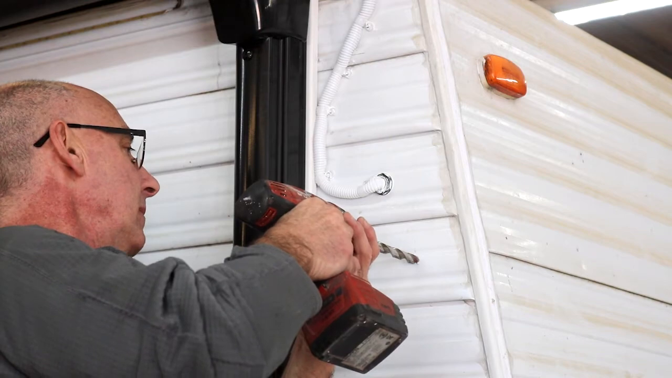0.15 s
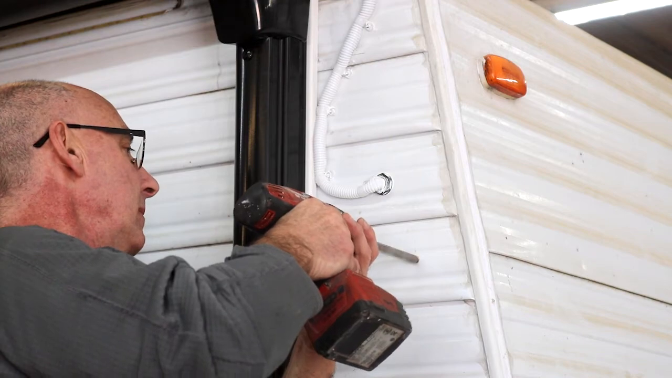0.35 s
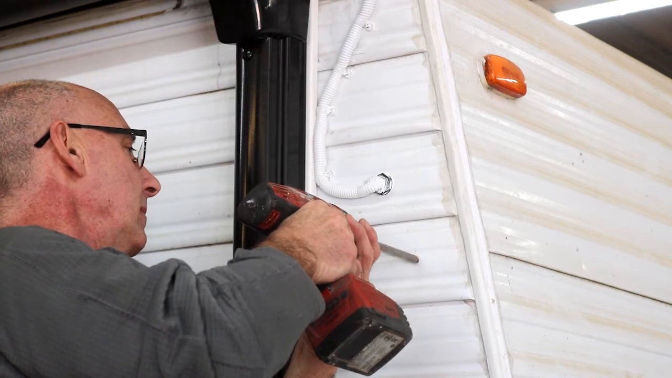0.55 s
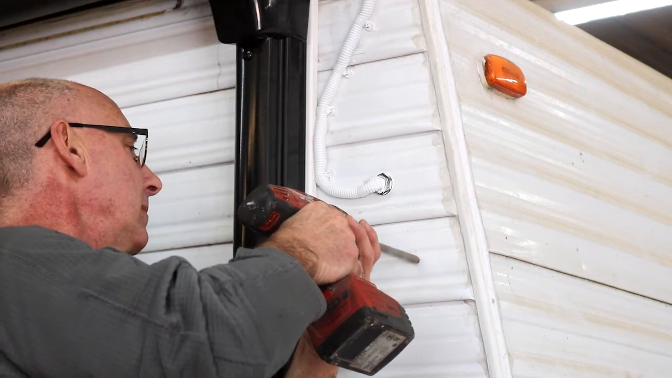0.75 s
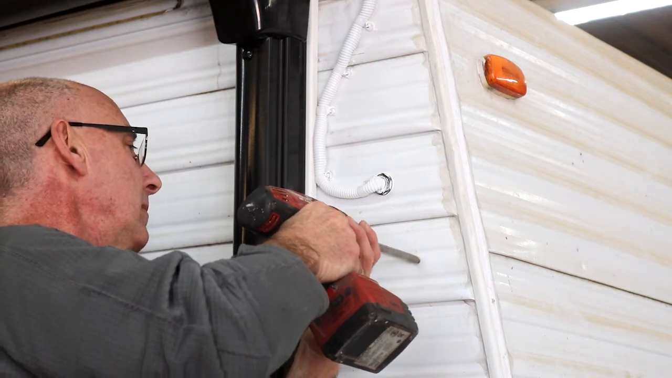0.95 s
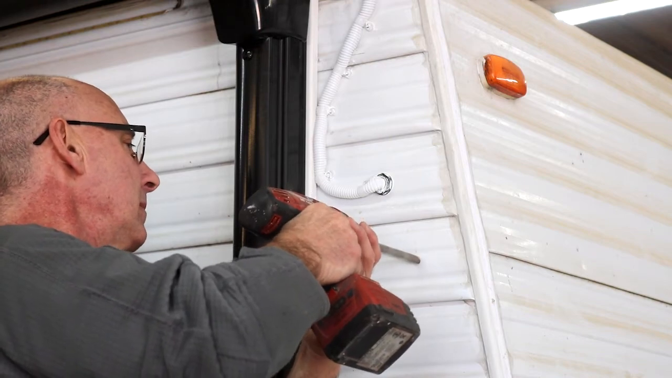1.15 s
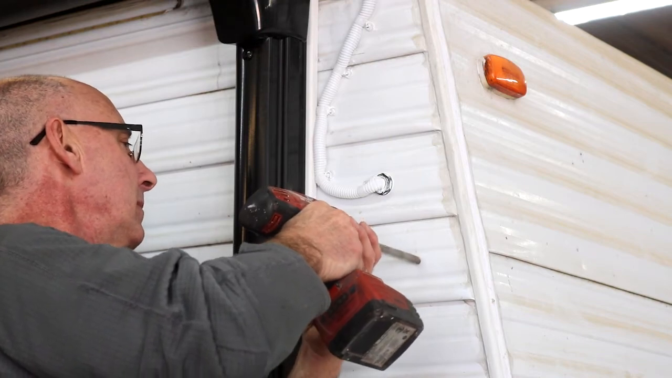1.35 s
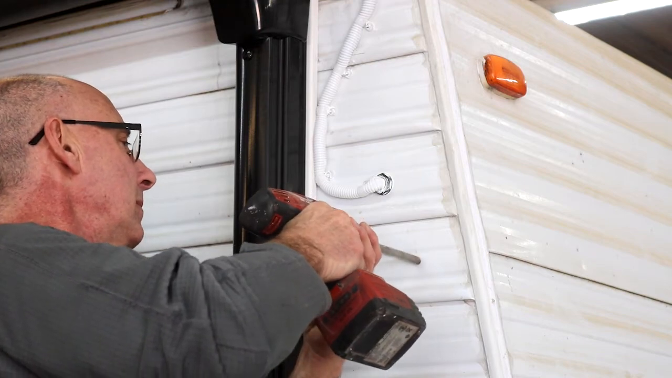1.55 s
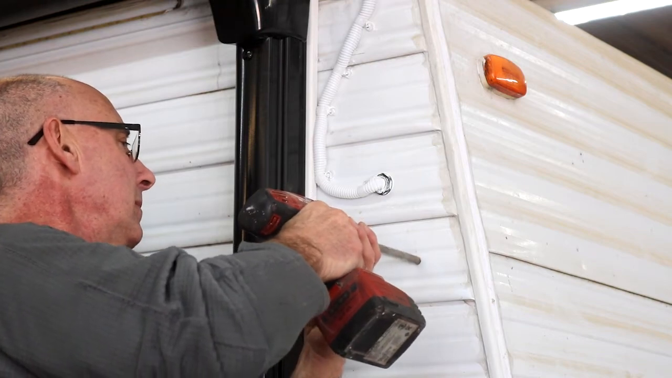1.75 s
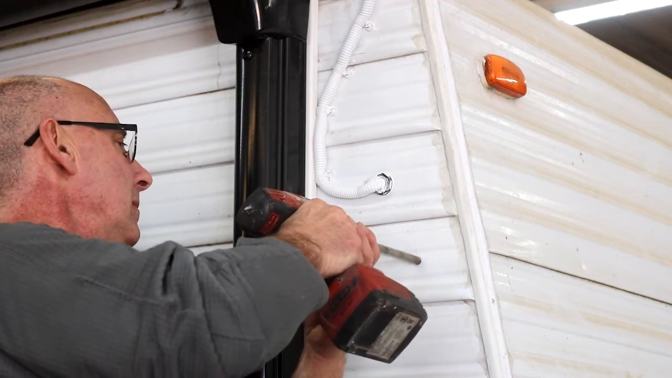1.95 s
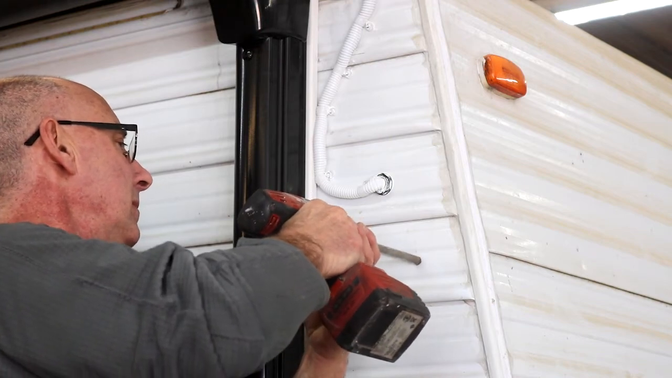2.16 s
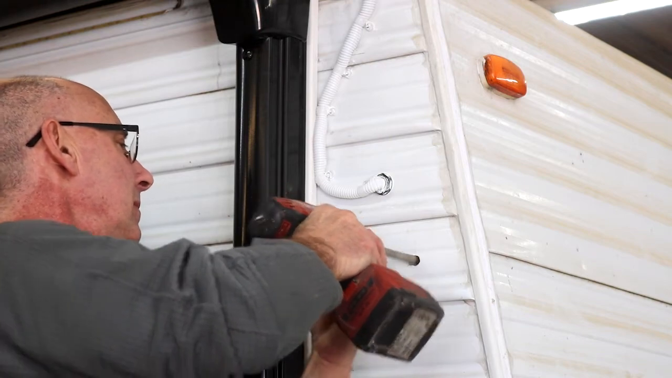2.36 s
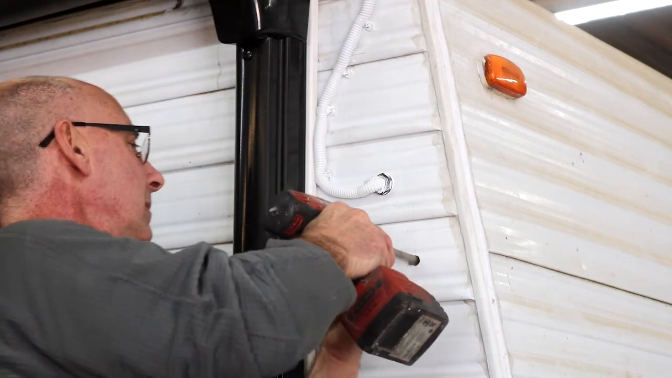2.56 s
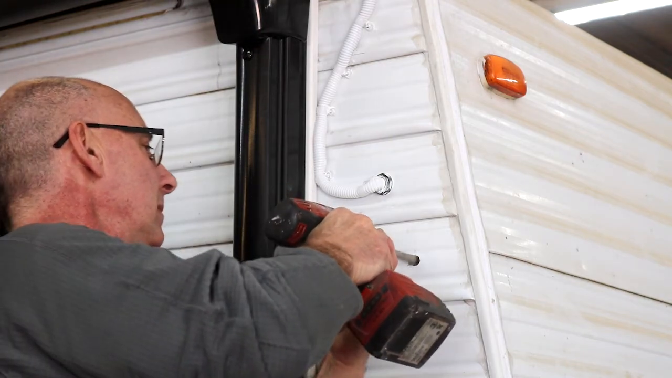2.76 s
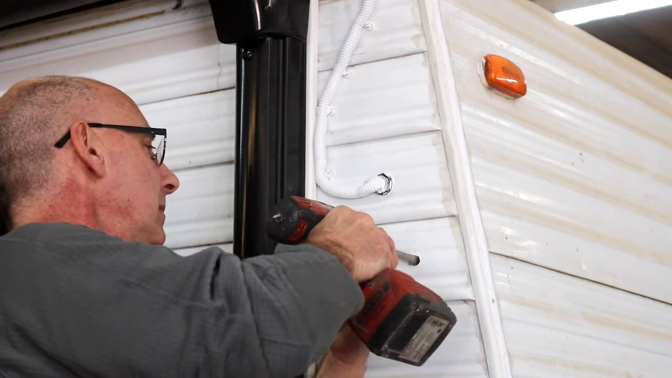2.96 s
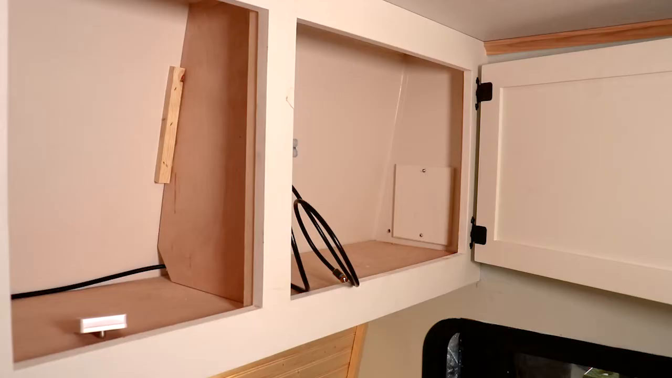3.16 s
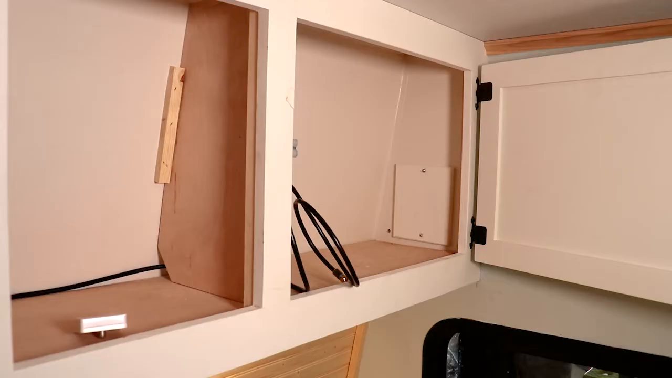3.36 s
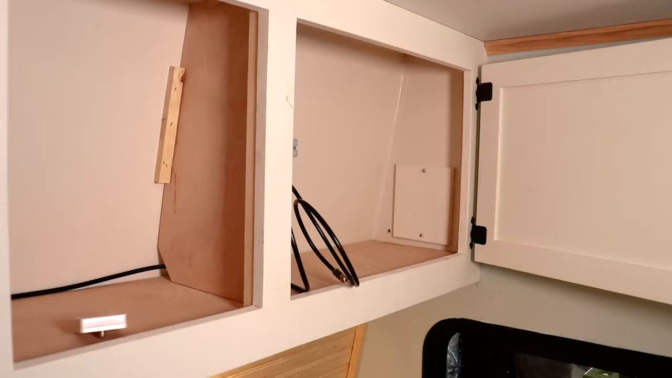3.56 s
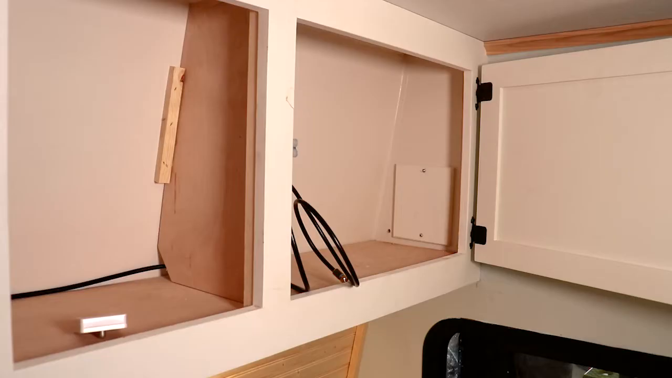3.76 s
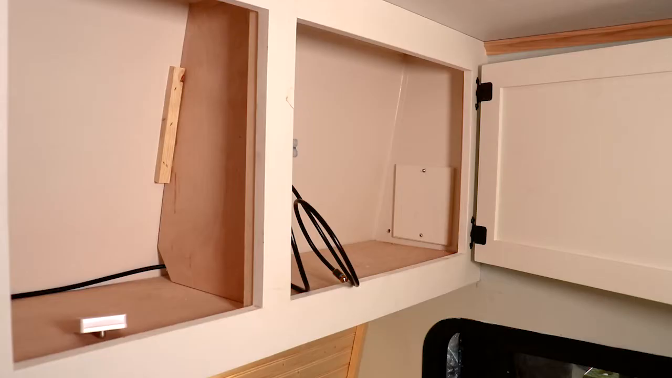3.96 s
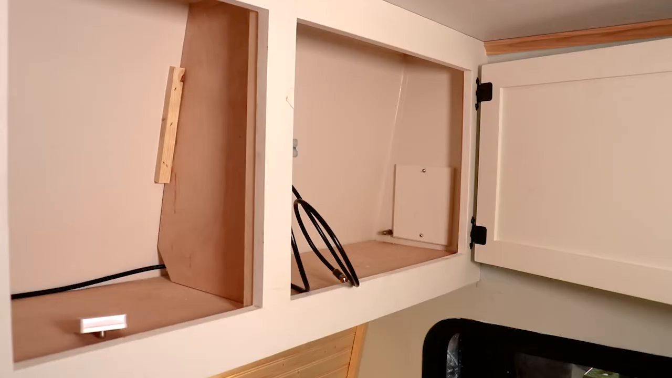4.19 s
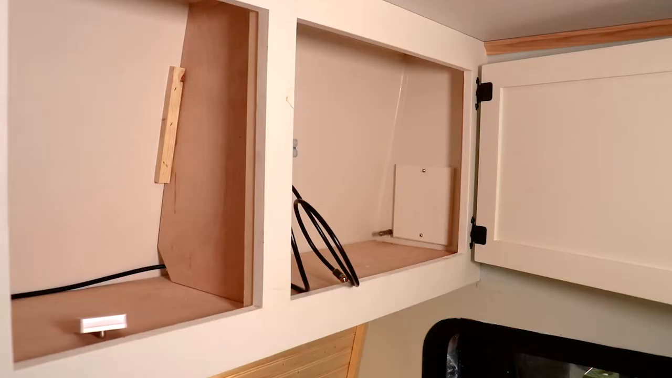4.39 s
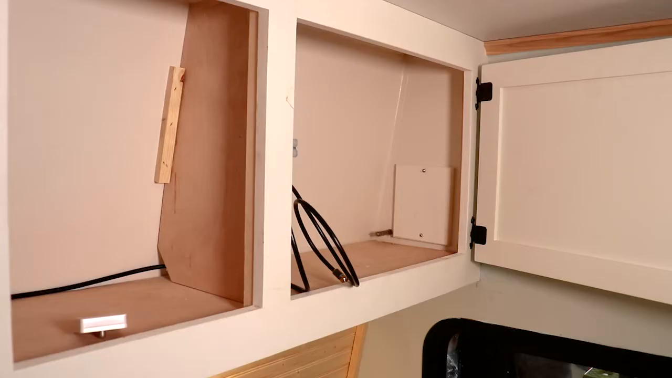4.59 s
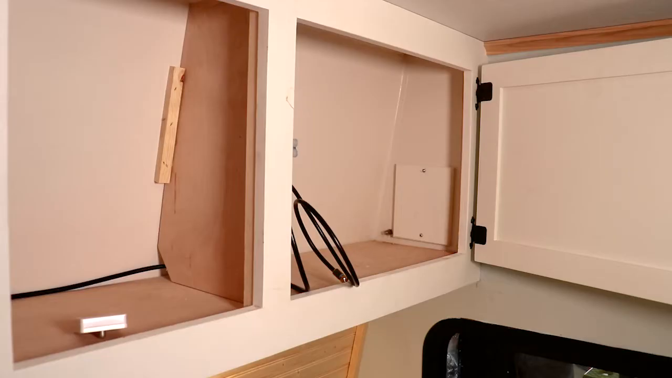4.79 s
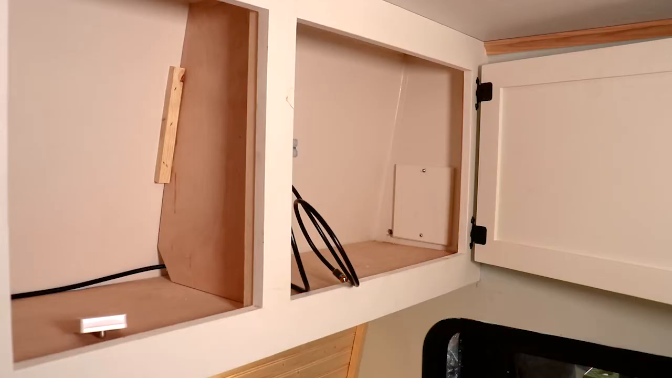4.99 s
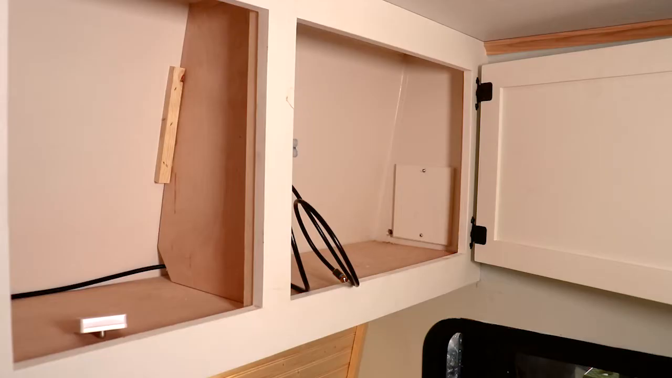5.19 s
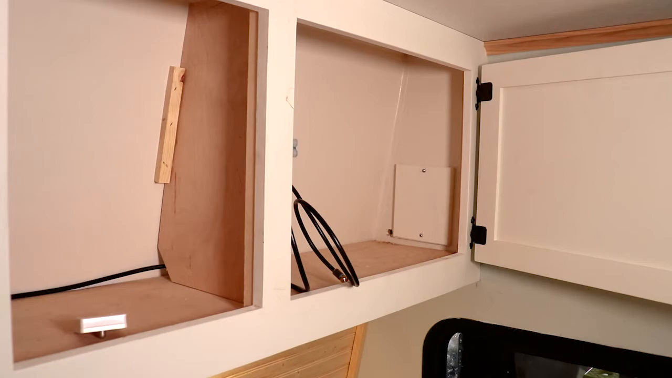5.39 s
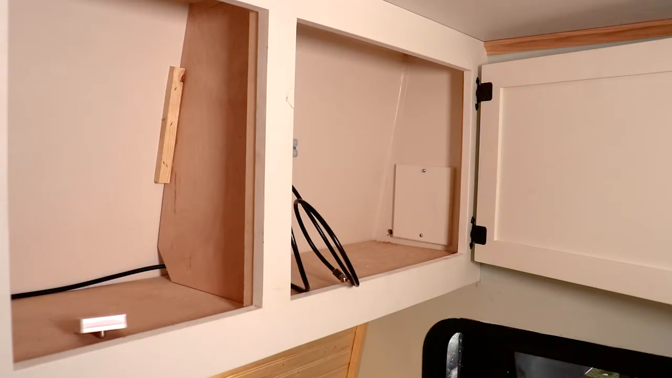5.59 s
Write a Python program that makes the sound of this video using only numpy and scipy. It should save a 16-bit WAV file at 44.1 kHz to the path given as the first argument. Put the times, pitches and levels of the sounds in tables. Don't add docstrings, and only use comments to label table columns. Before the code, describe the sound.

Trigger click, loud drill whine and rattling metal bites, cracking breakthrough, then quieter muffled drilling heard from the cabinet, ending in an abrupt stop.

```python
import sys
import numpy as np
from scipy import signal
from scipy.fft import rfft, irfft
from scipy.io import wavfile
from scipy.ndimage import uniform_filter1d

SR = 44100
rng = np.random.default_rng(int(sys.argv[2]) if len(sys.argv) > 2 else 0)


def to_wav(s):
    ch = np.atleast_2d(s).T
    pcm = np.round(np.clip(ch, -1, 1) * 32767)
    wavfile.write(sys.argv[1], SR, pcm.astype(np.int16))


def field_ratio(decibels):
    return 10 ** (np.asarray(decibels, dtype=float) / 20)


N = 248415
T = np.arange(N) / SR

SCENE_CHANGES_S = 3.195
OUTSIDE_NOW = T < SCENE_CHANGES_S
START_S, SPIN_UP_S, BRAKE_S = 0.32, 0.087, 5.238
DIGS_IN_S = 0.91

# time in seconds, effort in dB, cut in dB (how hard the edges scrape),
# depth in dB (how much wall the bit shakes).
WORK = [(.4, 2.5, -6.5, -2.5), (.5, 4, -2, 0), (.58, 2.5, -5, 2.5), (.92, 2.5, -3, 1),
        (1.16, 1.5, -1, -1.5), (1.82, -1, 2, -1), (2.3, -0.5, 1.5, 4), (2.84, -5, -4, 4),
        (3.04, -1.5, 0.5, 3.5), (3.19, 0, -4, 7), (3.2, -3, 1, 3), (3.42, -2, -0.5, -1),
        (3.96, 0.5, 3.5, 0.5), (4.19, -1, 0, -0.5), (4.45, -0.5, -5, -1), (4.8, 3, -6, 4), (5.15, .5, 0, 4),
        (5.28, 1, 5, 0)]
# start in seconds, peak in dB, ring in Hz.
CRACKS = [(2.301, -6.5, 1380), (2.314, -2, 2640), (2.32, -11.5, 690), (2.366, -19, 1410), (2.403, -8, 1420),
          (2.433, -8, 1180), (2.473, -10.5, 660), (2.607, -6, 1430), (2.65, -7.5, 1070), (2.661, -4, 704),
          (2.667, -9, 676), (2.689, -7.5, 1140), (2.728, -13, 660), (2.82, -16, 680), (2.913, -7.5, 720),
          (2.972, -17, 1200), (3.041, -7, 1210), (3.066, -5, 1380), (3.118, -7.5, 734)]


def evened(x):
    return x / np.sqrt(np.mean(x ** 2) + 1e-20)


def read(points, hz):
    f, value = np.transpose(points)
    return np.interp(np.log(hz + 1), np.log(f + 1), value)


def columns(rows):
    s, *rest = np.transpose(rows)
    return [np.interp(T, s, c) for c in rest]


def wander(hz):
    z = rfft(rng.standard_normal(N))
    return evened(irfft(z / (1 + (np.fft.rfftfreq(N, 1 / SR) / hz) ** 2), N))


def band_passed(x, low_hz, high_hz):
    sos = signal.butter(2, [low_hz / SR * 2, high_hz / SR * 2], "band", output="sos")
    return signal.sosfilt(sos, x)


def rumble():
    low = band_passed(rng.standard_normal(N), 22, 200)
    return field_ratio(np.where(OUTSIDE_NOW, -62., -72.)) * evened(low)


def lamp_hum():
    # frequency in Hz, level in dB.
    lamps = [(120, -57), (240, -74), (360, -60), (600, -61)]
    hum = sum(field_ratio(db) * np.sin(2 * np.pi * hz * T) for hz, db in lamps)
    return hum * np.where(OUTSIDE_NOW, 1, field_ratio(-12.0))


def hall(x):
    # frequency in Hz, time to fall 60 dB in seconds.
    decay = [(100, 0.62), (500, 0.41), (2000, 0.21), (6000, 0.076), (15000, 0.047)]
    taps = np.zeros(SR)
    at = np.arange(200, SR - 20, 20)
    taps[at + rng.integers(0, 20, len(at))] = rng.choice([-1., 1.], len(at))
    hz, t, z = signal.stft(taps, SR, nperseg=256)
    tail = signal.istft(z * field_ratio(-60 * t / read(decay, hz)[:, None]), SR, nperseg=256)[1]
    return signal.fftconvolve(x, tail / np.linalg.norm(tail))[:N]


def running():
    return np.clip(1 - (T - START_S) / SPIN_UP_S, 0, 1), np.maximum(T - BRAKE_S, 0)


def speed():
    # time in seconds, commutator rate in Hz.
    pulling = [(.315, 7760), (.37, 5250), (.52, 4680), (1.1, 4620), (1.35, 4460), (1.7, 4380), (1.94, 4340),
               (2.27, 4240), (2.55, 4630), (2.95, 4580), (3.35, 4550), (3.58, 4610), (4.13, 4380),
               (4.35, 4550), (4.9, 4670), (5.3, 4610)]
    # start in seconds, end in seconds, drag at the start in Hz, drag at the end in Hz.
    stalls = [
        (.53, .825, 700, 1280),
        (2.268, 2.41, 800, 560),
        (4.13, 4.22, 360, 1360),
    ]
    inertia_s = .11
    pull = columns(pulling)[0] * (T >= pulling[0][0])
    for start, end, first_hz, last_hz in stalls:
        pull = pull - np.interp(T, [start, end], [first_hz, last_hz], left=0, right=0)
    keep = np.exp(-1 / (SR * inertia_s))
    return signal.lfilter([1 - keep], [1, -keep], pull)


def load():
    free_hz = 4650
    return np.clip(1 - speed() / free_hz, 0, .25)


def lip_turns():
    # time in seconds, bite rate as a factor on the chuck speed.
    chatter = [(4.3, 1), (4.4, .95), (4.7, .93), (4.8, 1.145)]
    chuck_ratio, lip_start_s = 231, 1.0112
    turns = np.cumsum(speed() * columns(chatter)[0]) / SR / chuck_ratio
    return 2 * (turns - turns[round(lip_start_s * SR)])


def trigger_clicks():
    # start in seconds, level in dB.
    clicks = [
        (.243, -45),
        (0.312, -25),
        (.319, -23.5),
        (.324, -38),
    ]
    out, t = np.zeros(N + 6000), np.arange(6000) / SR
    for s, db in clicks:
        click = np.sin(2 * np.pi * 5330 * t) + 0.36 * np.sin(2 * np.pi * 4950 * t)
        click += 0.097 * rng.standard_normal(len(t))
        out[round(s * SR):][:len(t)] += field_ratio(db - 60 * t / 0.076) * click
    return band_passed(out[:N], 130, 7500)


def sprays():
    # start in seconds, level in dB.
    bursts = [
        (2.313, -23),
        (2.42, -26),
        (2.66, -25),
        (5.186, -32),
    ]
    out, t = np.zeros(N + 2000), np.arange(2000) / SR
    for (s, db), noise in zip(bursts, rng.standard_normal((len(bursts), len(t)))):
        out[round(s * SR):][:len(t)] += field_ratio(db - 60 * t / 0.064) * noise * np.minimum(t / .002, 1)
    return band_passed(out[:N], 5000, 13000)


def knocks():
    # start in seconds, peak in dB, ring in Hz.
    snags = [(0.522, -8, 2420), (0.631, -11.5, 1210), (.875, -12, 1520), (1.011, -5, 1210),
             (1.062, -4, 1210), (1.113, -7, 1270), (1.164, -5.5, 1230), (1.266, -8, 1270),
             (1.317, -14, 1236), (1.421, -10, 1220), (1.527, -7, 1230), (1.578, -8, 1230),
             (1.6, -6.5, 1100), (1.653, -7, 1380), (1.676, -12, 2240), (1.706, -13, 1200),
             (1.73, -20, 1240), (1.785, -18, 1230), (1.835, -15, 1220), (1.942, -13, 1190),
             (1.991, -13, 1160), (2.05, -23, 1260)]
    # start in seconds, peak in dB, ring in Hz.
    splinters = [(3.266, -13.5, 824), (3.352, -15.5, 1160), (3.456, -17.5, 1170), (4.125, -13.5, 1380),
                 (4.232, -16.5, 1390), (4.247, -15.5, 683), (4.514, -20.5, 880), (4.709, -15, 1380),
                 (5.1, -13, 1350), (5.112, -13.5, 670), (5.122, -12, 676), (5.147, -15.5, 1310),
                 (5.177, -14.5, 1370), (5.186, -12.5, 1400)]
    # treble in dB, time to fall 60 dB in seconds.
    rings = [
        (-20, .027),
        (-17, .024),
        (-14, .022),
    ]
    out, t = np.zeros(N + 6000), np.arange(6000) / SR
    rows = [(*row, *kind) for table, kind in zip((snags, CRACKS, splinters), rings) for row in table]
    for (s, db, hz, treble_db, t60), noise in zip(rows, rng.standard_normal((len(rows), len(t)))):
        body = band_passed(noise, 500, 4200)
        ring = (np.sin(2 * np.pi * hz * t) + 0.72 * evened(body)) * field_ratio(-60 * t / max(t60, .008))
        crack = field_ratio(treble_db - 2.0) * noise * field_ratio(-60 * t / 0.016)
        crack += 0.7 * np.sin(2 * np.pi * 2600 * t) * field_ratio(-60 * t / 0.0058)
        thump = np.sin(2 * np.pi * 190 * t) + np.sin(2 * np.pi * 370 * t)
        thump *= field_ratio(-16.5) * (1 - np.exp(-t / 0.0022)) * field_ratio(-60 * t / 0.078)
        onset = 1 - np.exp(-t / 0.00042)
        out[round(s * SR):][:len(t)] += field_ratio(db - 4.0) * onset * (ring + crack + thump)
    return band_passed(out[:N], 130, 7500)


def drone():
    # multiple of the bite rate, level in dB.
    multiples = [(2, -13), (3, -9), (4, -0.5), (5, 1.5), (6, -5), (7, 1), (8, 1.5), (9, 2), (10, 2.5),
                 (11, -19), (12, 1.5)]
    lean_db, lean_load = 7, 0.075
    lips, (rising, braked) = lip_turns(), running()
    level_db = -43. + 0.7 * columns(WORK)[1] - 9.5 * (T > SCENE_CHANGES_S)
    level_db += 1.35 * wander(6.6) - 25 * rising - 150 * braked
    through_s = CRACKS[0][0]
    in_sheet = np.interp(T, [DIGS_IN_S, DIGS_IN_S + .1, through_s, through_s + .03], [0, 1, 1, 0])
    low_db = np.where(OUTSIDE_NOW, 0, -7.)
    low_db += lean_db * (np.clip(load() / lean_load, 0, 1) * in_sheet - .5)
    out = np.zeros(N)
    for k, db in multiples:
        swell = field_ratio(db + low_db * (k < 5) + 3.25 * wander(1.07))
        out += swell * np.sin(2 * np.pi * (k * lips + rng.random()))
    return field_ratio(level_db) * out


def sine(turns, wobble_db):
    level = evened(field_ratio(wobble_db * (wander(30.) + .55 * wander(7.))))
    return np.sqrt(2) * level * np.sin(2 * np.pi * (turns + .08 * wander(35.)))


def whines():
    # time in seconds, commutator in dB, gear mesh in dB,
    # fan and ring gear in dB.
    grip = [(.37, -52, -58, -59), (.42, -26.5, -32, -51), (.75, -27.5, -25, -43), (.95, -25, -21.5, -58),
            (1.1, -29.5, -33, -58), (1.4, -27, -29, -53), (1.55, -41, -26, -64), (1.95, -32.5, -27.5, -57),
            (2.42, -39.5, -31.5, -54), (2.7, -35.5, -54, -60), (2.95, -36.5, -37, -50),
            (3.17, -35, -38, -66), (3.3, -42, -49, -72), (4.08, -37.5, -45, -51), (4.18, -41, -30.5, -62),
            (4.45, -37.5, -41.5, -61), (5.05, -38, -41, -47.5), (5.22, -58, -56, -46)]
    ring_orders = (1.13, 1.459, 1.684, 1.9, 2.135, 2.797)
    ring_levels = (0, 3, 4, 4, -9, -10)
    mesh_order, blade_order = .693, 1.409
    housing_order, housing_top_hz, housing_fall_db_per_khz2 = 1.335, 4500, 19
    first_db, mesh_db, ring_db = columns(grip)
    hz = speed()
    first_db = first_db + 1.25 * wander(4.6)
    blade_db = ring_db + 11 - 60. * load()
    second_db = -40 - 100. * load() - 5 * (T > SCENE_CHANGES_S) + 2. * wander(4.)
    housing_hz = housing_order * hz
    above_khz = np.maximum(housing_hz - housing_top_hz, 0) / 1000
    housing_db = -22 - housing_fall_db_per_khz2 * above_khz ** 2
    housing_db += np.interp(T, [.335, .355, DIGS_IN_S, DIGS_IN_S + .04], [-30, 0, 0, -60])
    turns = np.cumsum(hz) / SR
    out = field_ratio(first_db) * (1.15 * sine(turns, 2) + .22 * sine(.94 * turns, 4))
    out += field_ratio(second_db + 1.5) * sine(2 * turns, 3.2)
    out += field_ratio(mesh_db) * sine(mesh_order * turns, 1.3)
    out += field_ratio(housing_db) * sine(np.cumsum(housing_hz) / SR, 1.8)
    out += field_ratio(blade_db) * sine(blade_order * turns, 5.5)
    for order, db in zip(ring_orders, ring_levels):
        out += field_ratio(ring_db + db) * sine(order * turns, 3)
    return out * np.interp(T, [.315, .33, 5.08, 5.12, 5.3], [0, 1, 1, .45, 0])


def coloured(x, band, ring):
    # frequency in Hz, level in dB per Hz.
    skating = [(24, -63), (40, -30), (174, -14), (235, -13), (369, -9.5), (742, -9.5), (1000, -2),
               (1730, -5), (2720, 0), (3240, -4.5), (5070, -0.5), (5750, -7.5), (8790, -10.5), (15600, -25)]
    # frequency in Hz, level in dB per Hz.
    outside = [(24, -60), (40, -44.5), (143, -12), (235, -12.5), (360, -1), (623, -2.5), (672, -3),
               (1220, -2.5), (1820, -4.5), (3080, -5.5), (3760, -7.5), (4480, -9), (5750, -12.5),
               (9010, -16), (15600, -30)]
    # frequency in Hz, level in dB per Hz.
    inside = [(24, -64), (40, -28), (287, -4.5), (360, -2.5), (408, -1.5), (672, -2), (977, -2.5),
              (1190, -5.5), (1610, -4.5), (2860, -1), (3670, -3), (4480, -4.5), (5750, -12), (9010, -19.5),
              (15600, -32)]
    # frequency in Hz, width in Hz, level in dB.
    resonances = [(185, 23, -6), (356.2, 3.7, 14), (452, 17, 0), (691, 8.7, 1.5), (1210, 34, -8),
                  (1380, 95, -4.5), (2220, 260, -7), (2485, 25, 5.5)]
    hz = np.fft.rfftfreq(N, 1 / SR)
    edges = 1 / np.sqrt((1 + (band[0] / (hz + 1)) ** 8) * (1 + (hz / band[1]) ** 8))
    wall = 1 + ring * sum(field_ratio(db) / (1 + (2 * (hz - f) / w) ** 2) for f, w, db in resonances)
    wall *= field_ratio(1.5 * evened(uniform_filter1d(rng.standard_normal(len(hz)), size=110)))
    z = rfft(x) * edges * wall
    early, sunk, behind = (evened(irfft(z * field_ratio(read(place, hz)), N)) for place in (skating, outside, inside))
    dug = np.interp(T, [DIGS_IN_S - .08, DIGS_IN_S + 0.055], [0, 1])
    return np.where(OUTSIDE_NOW, (1 - dug) * early + dug * sunk, behind)


def chips(per_s, spread_db):
    size = field_ratio(spread_db * np.minimum(rng.exponential(1, N), 5)) * (rng.random(N) < per_s / SR)
    return evened(size * rng.standard_normal(N))


def layer_levels():
    # outside in dB, inside in dB, shares of effort, of cut and of depth.
    layers = [
        (-31, -36.5, .05, 0.11, 1),
        (-25.5, -37, .05, 1, .05),
        (-23, -35, 1, 0.11, .05),
        (-29.5, -37, 0.97, -0.25, .05),
    ]
    # echo of the earlier burst in dB, its fall in dB/s,
    # quiet hall in dB, fall after the brake in dB/s, spin-up in dB.
    tails = [
        (-42, 96, -58, 55, 15),
        (-39.5, 72, -60, 58, 9),
        (-28.5, 128, -53.5, 71, 9.5),
        (-41.5, 122, -59.5, 116, 20),
    ]
    work, (rising, braked), out = np.array(columns(WORK)), running(), []
    for (outside_db, inside_db, *shares), tail in zip(layers, tails):
        echo_db, echo_fall, quiet_db, fall, spin_db = tail
        before = 10 * np.log10(field_ratio(echo_db - echo_fall * T) ** 2 + field_ratio(quiet_db) ** 2)
        during = np.where(OUTSIDE_NOW, outside_db, inside_db) + np.dot(shares, work)
        during = during - spin_db * rising - fall * braked
        out.append(np.where(T < START_S, before, during))
    sunk_s = np.clip(T - DIGS_IN_S, 0, 1.4) * OUTSIDE_NOW
    out[3] = out[3] - 8.5 * (T > START_S + SPIN_UP_S) * load() - 2 * sunk_s
    return out


def grip_of_lips():
    loose_s = 4.15
    rising, braked = running()
    bite = np.where(T < loose_s, 0.47, .12)
    return np.clip(bite + 0.049 * wander(1.1), 0, 1) * (1 - rising) * (braked == 0)


def boring():
    # low edge in Hz, high edge in Hz.
    bands = [
        (95, 700),
        (700, 1800),
        (1800, 5500),
        (5500, 17000),
    ]
    bite, lips = grip_of_lips(), lip_turns() + 0.028 * wander(4.86)
    count = (np.floor(lips) - np.floor(lips.min())).astype(int)
    strength = field_ratio(np.clip(rng.standard_normal(count.max() + 1), -2, 1.2) * 1.8)[count]
    throb = bite * strength * np.exp(-(lips % 1) / 0.094)
    levels = layer_levels()
    thrum = chips(9000, 0.57) * (1 + 0.4 * throb)
    cutting = chips(12000, 2.13) * (1 + 2.0 * throb)
    rattle = chips(20000, 0.18) * (1 + 1.3 * throb)
    fan = chips(25000, 0.8) * (1 + 0.16 * throb)
    shudder = wander(26.0)

    t = np.arange(2000) / SR
    panel = np.sin(2 * np.pi * 1215 * t) * field_ratio(-60 * t / .026)
    panel += .45 * np.sin(2 * np.pi * 2200 * t) * field_ratio(-60 * t / .018)
    panel *= 1 - np.exp(-t / 0.00099)
    blows = np.diff(count, prepend=count[0]) * strength * bite
    out = field_ratio(levels[1] + 17) * signal.oaconvolve(blows, panel)[:N]

    noises = (thrum, cutting, rattle, fan)
    trims_db, rings = (-1.27, 0.0035, -0.66, -0.95), (0.7, 0.81, 0.45, .01)
    shakes_db = (1.2, 0.88, 1.27, 0.52)
    for x, band, level_db, trim_db, ring, shake_db in zip(noises, bands, levels, trims_db, rings, shakes_db):
        steady = x / np.sqrt(uniform_filter1d(x ** 2, 8000))
        out += field_ratio(level_db + trim_db + shake_db * shudder) * coloured(steady, band, ring)
    return out


def scene():
    tones = whines()
    hits = knocks() + trigger_clicks()
    sent = field_ratio(-12) * tones + field_ratio(-10) * hits
    echo = np.where(OUTSIDE_NOW, hall(sent), hall(sent * ~OUTSIDE_NOW))
    mono = rumble() + lamp_hum() + echo + sprays() + hits + drone() + field_ratio(-1.3) * tones + boring()
    return np.array([mono, mono])


def roll_off(x):
    return signal.sosfilt(signal.butter(12, 15700, fs=SR, output="sos"), x)


def record(dry):
    heard = dry + field_ratio(-68) * rng.standard_normal(N)
    thin = signal.sosfilt(signal.butter(2, 52 / SR * 2, "high", output="sos"), heard)
    limited = np.tanh(thin * .4) / .4
    return roll_off(limited)


dry = scene()
out = record(dry)
to_wav(out)
```